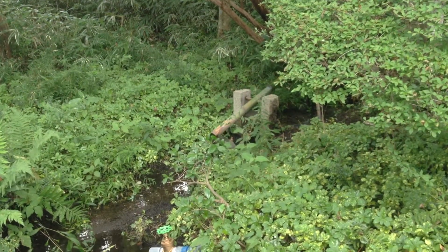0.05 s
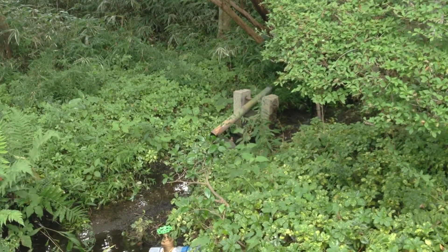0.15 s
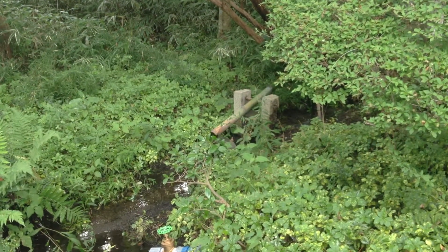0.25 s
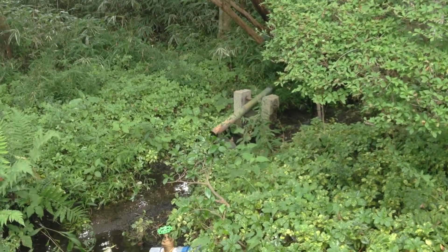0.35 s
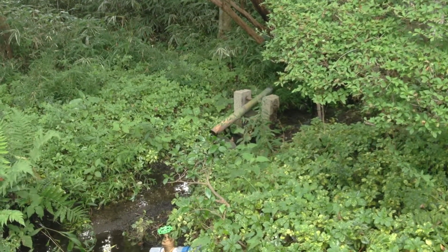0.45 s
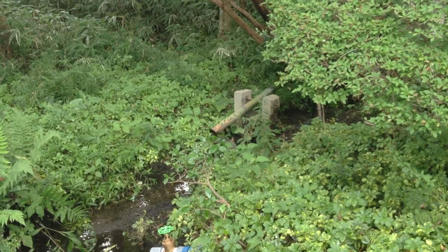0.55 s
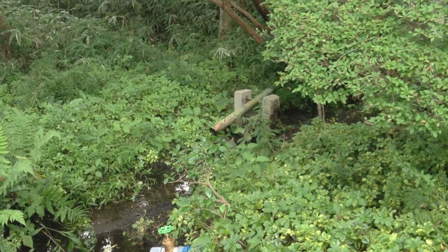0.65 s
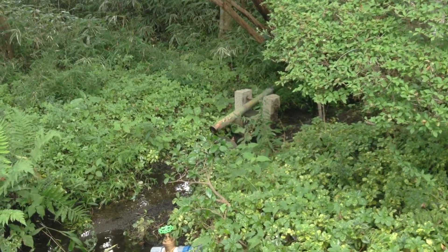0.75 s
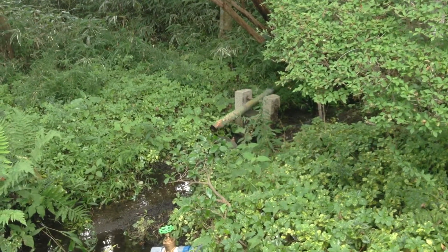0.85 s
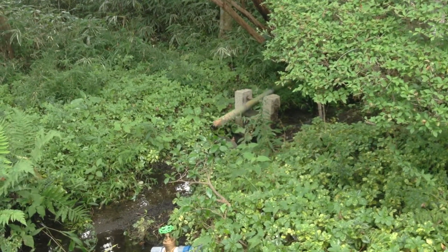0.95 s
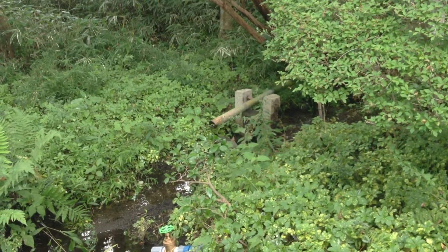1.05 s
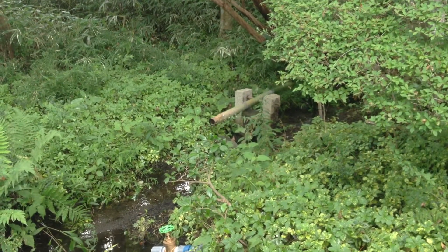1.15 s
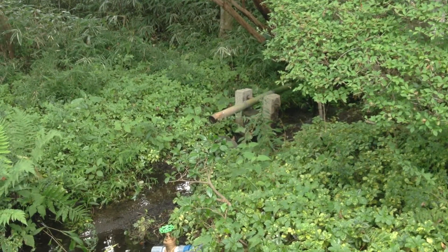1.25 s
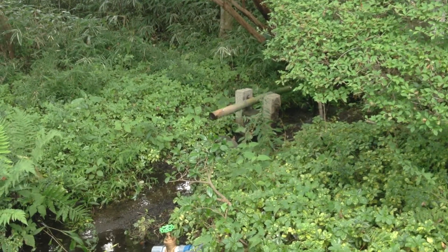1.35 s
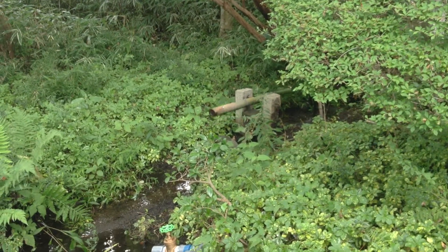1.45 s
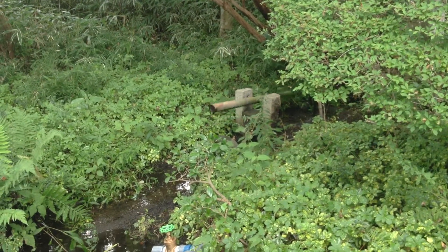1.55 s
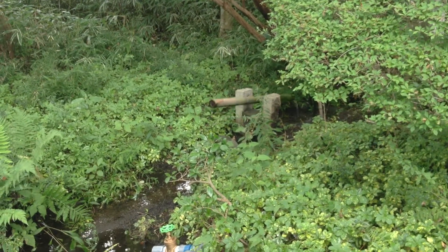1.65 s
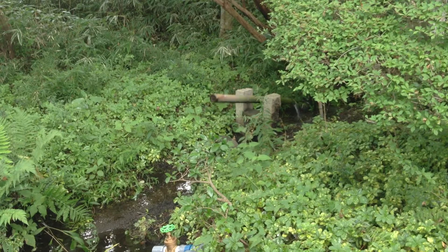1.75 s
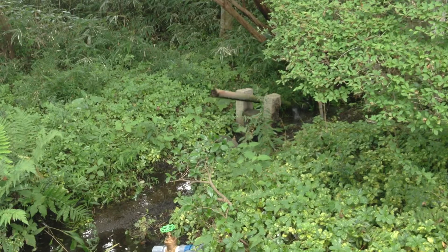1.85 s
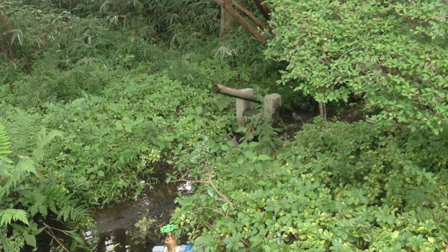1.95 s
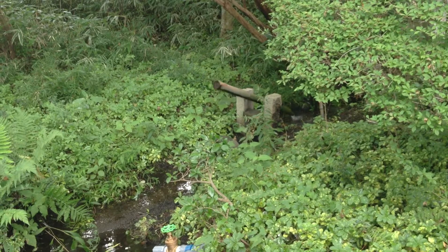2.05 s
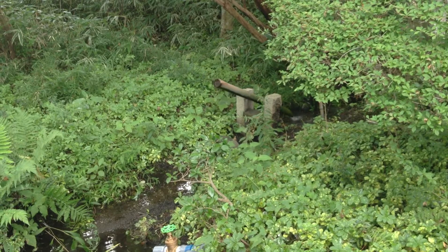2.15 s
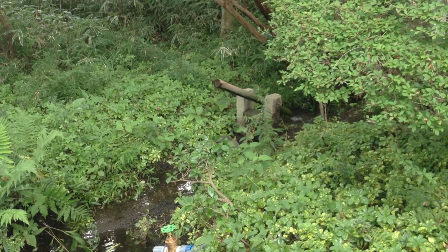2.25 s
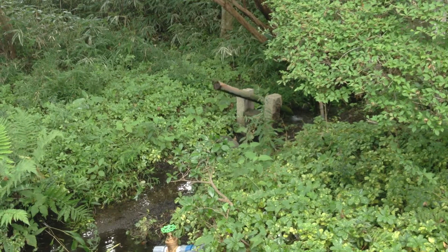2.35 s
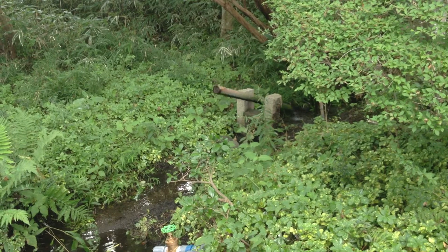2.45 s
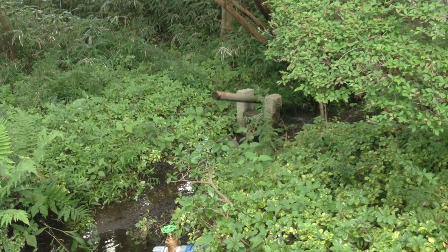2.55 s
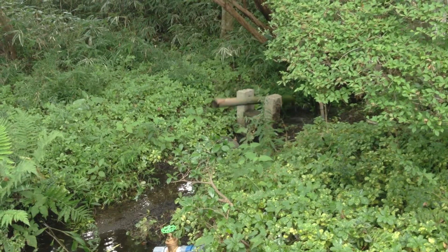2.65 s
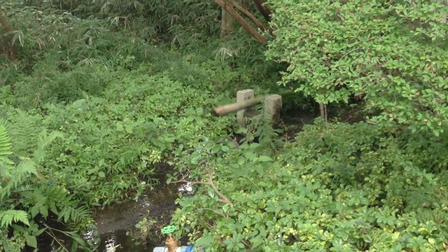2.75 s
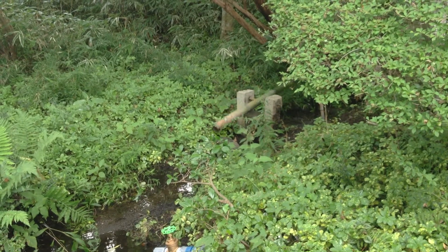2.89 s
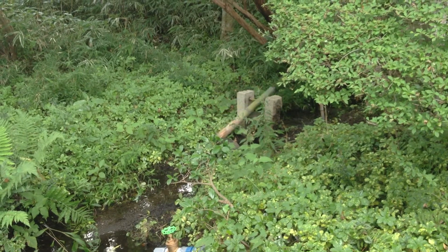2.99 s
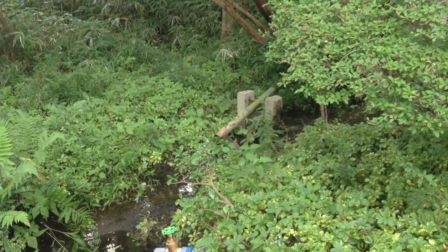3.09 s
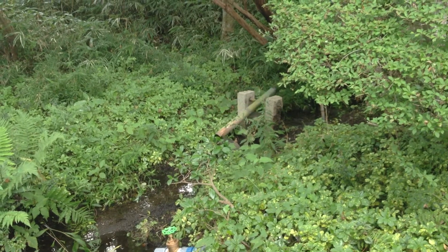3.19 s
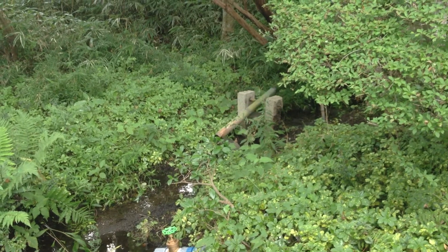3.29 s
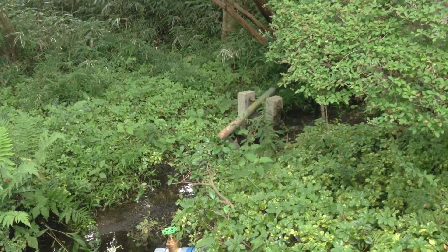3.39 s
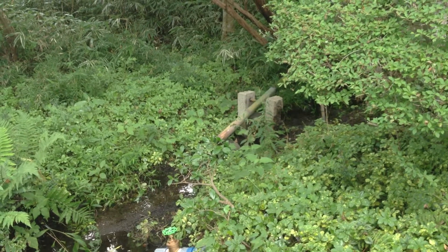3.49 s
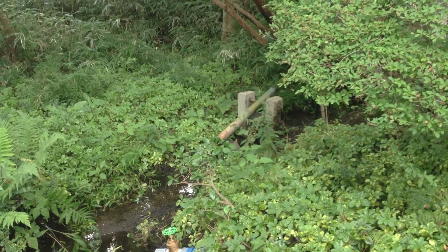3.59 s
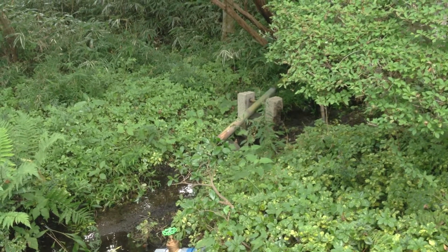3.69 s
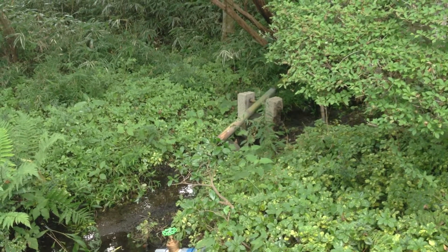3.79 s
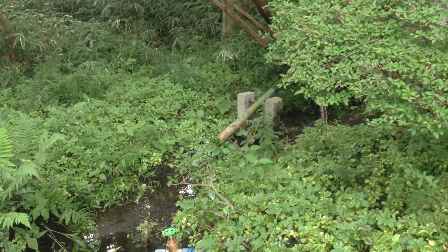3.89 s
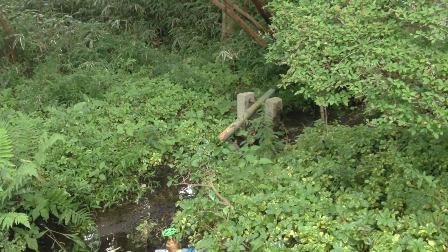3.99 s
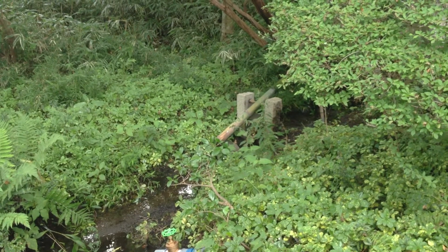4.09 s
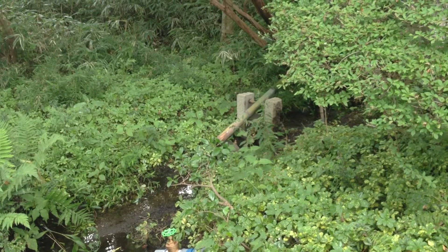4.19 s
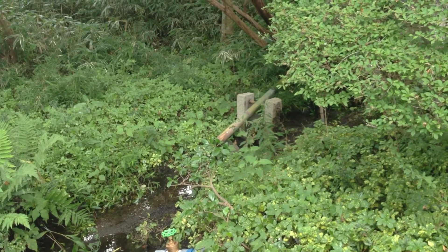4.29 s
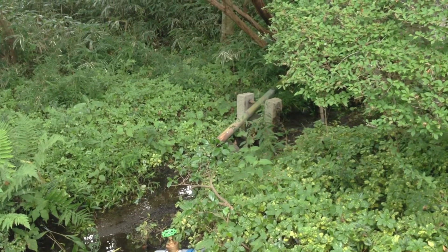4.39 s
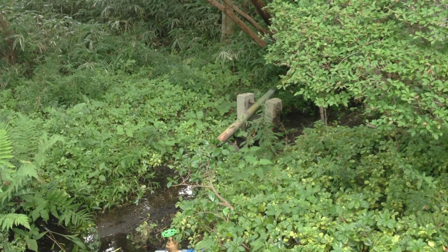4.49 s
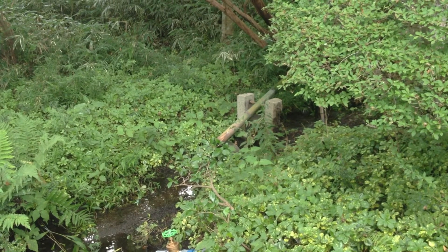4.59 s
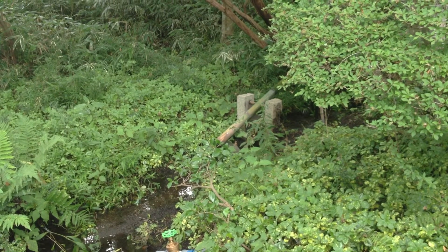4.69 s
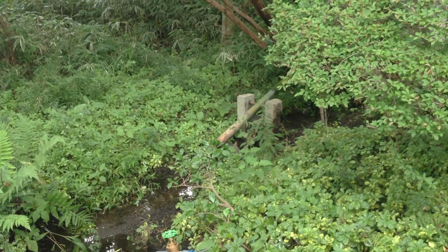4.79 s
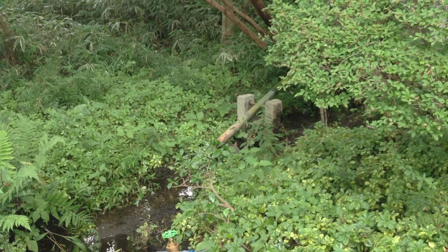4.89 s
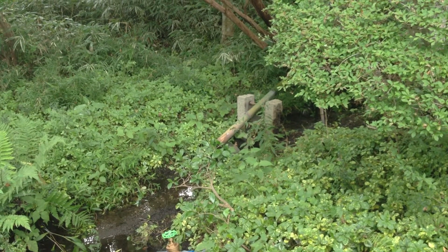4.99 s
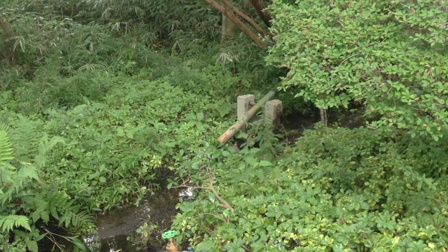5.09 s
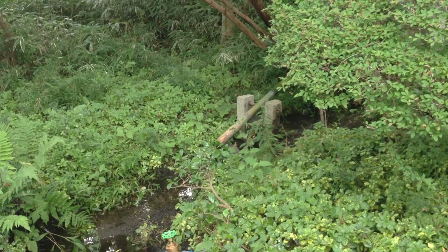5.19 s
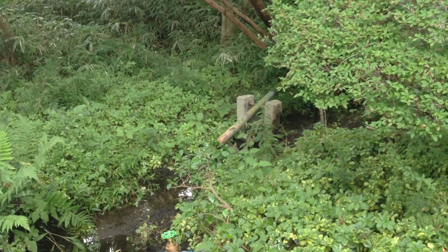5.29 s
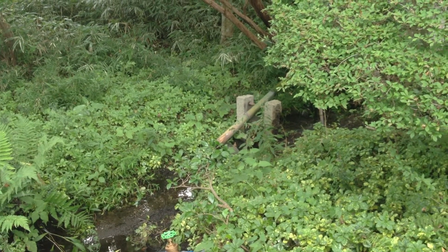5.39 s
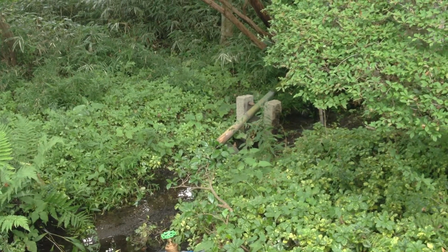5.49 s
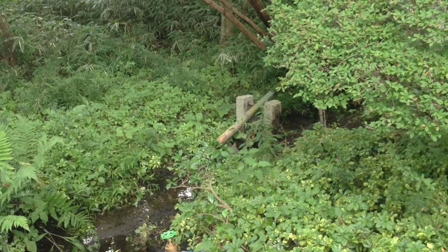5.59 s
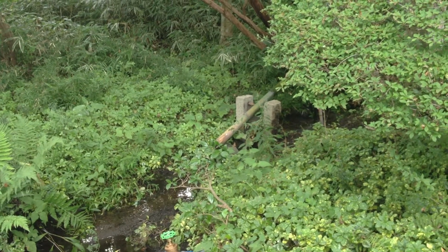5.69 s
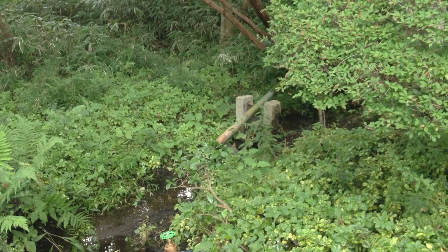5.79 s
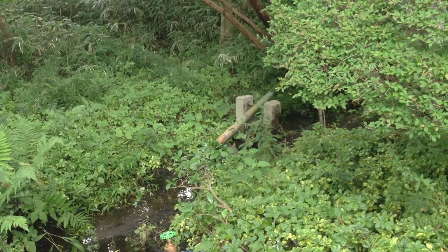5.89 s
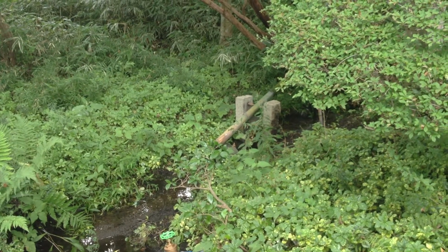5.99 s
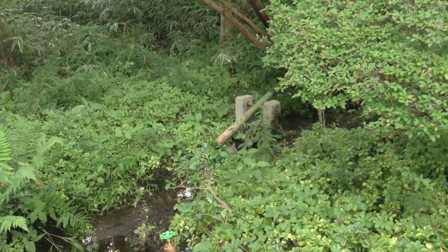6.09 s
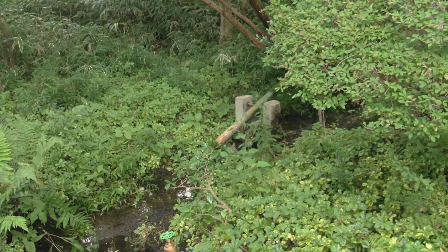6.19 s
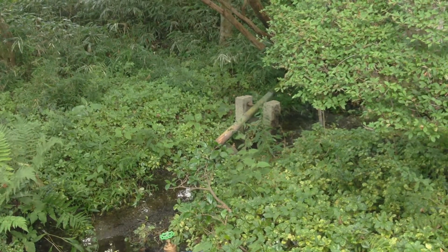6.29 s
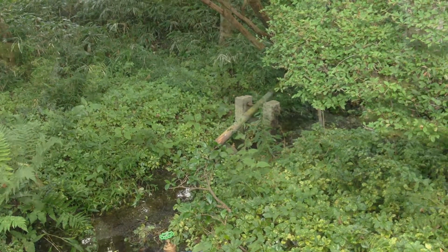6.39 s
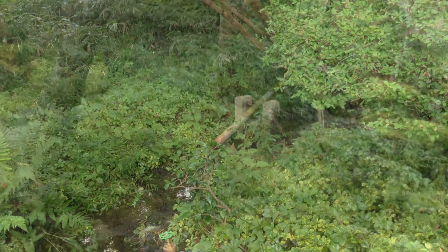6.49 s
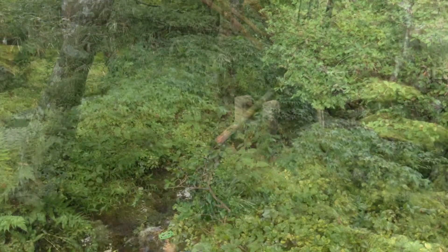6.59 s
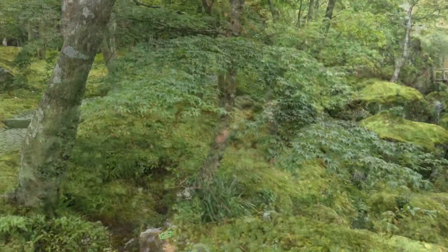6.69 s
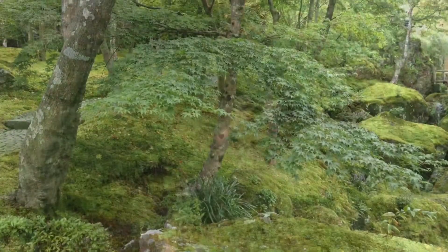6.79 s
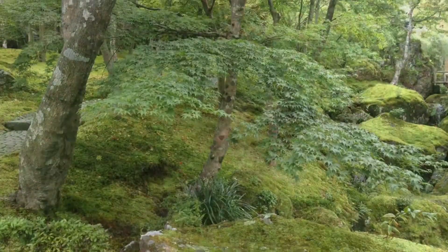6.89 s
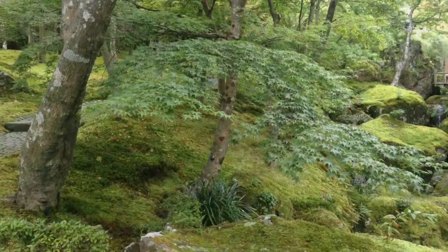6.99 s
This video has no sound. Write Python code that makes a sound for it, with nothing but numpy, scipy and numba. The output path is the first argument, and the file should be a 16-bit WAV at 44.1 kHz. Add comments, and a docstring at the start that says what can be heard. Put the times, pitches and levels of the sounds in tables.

```python
"""A garden stream, where a bamboo deer scarer pours out its water, knocks on its stone and bounces.
A cicada throbs throughout as pitch-swept tymbal clicks, over a hiss of distant cicadas in shaped noise.
The stream is murmuring noise with ringing bubbles; drips ring, drops slap, a far bird whistles wavering sines.
The tube gushes noise and bubbles, then rings as damped modes with cracks of noise.
The garden scatters knocks, pour and drops and returns one dull echo; at the end everything fades."""
import sys
import numpy as np
from scipy import signal
from scipy.fft import rfft, irfft
from scipy.io import wavfile
from numba import njit

SR = 44100
rng = np.random.default_rng(int(sys.argv[2]) if len(sys.argv) > 2 else 0)


def materialize(psi):
    """Save the field psi as 16-bit PCM at rate SR to the path in sys.argv[1].

    A 1-D psi becomes a single channel; in a 2-D psi each row is a channel.
    """
    bounded = np.clip(np.atleast_2d(psi).T, -1, 1)
    quanta = np.round(bounded * 32767).astype(np.int16)
    wavfile.write(sys.argv[1], SR, quanta)


N = 310905
T = np.arange(N) / SR

# Murmur of stream and distant town. Each row: frequency in Hz, relative level in dB.
STREAM_COLOUR = [(25, -36.5), (50, -23), (75, -10.5), (110, 1), (200, 2), (400, -0.5), (700, -3),
                 (1200, -6.5), (1800, -6.5), (2600, -3.5), (3600, -11), (6000, -6.5), (10000, -26.5),
                 (16000, -18.5)]
# Resonances of the cicada's hollow body. Each row: frequency in Hz, relative level in dB.
CICADA_BODY = [(3500, -18), (4600, -8), (5400, -2), (5850, -1.5), (6180, 6), (6600, -2), (7400, -3.5),
               (8100, -4), (8800, -22.5), (10300, -8.5), (11700, 0), (13000, -1), (15200, -1.5)]
# Far cicadas merged into a hiss. Each row: frequency in Hz, relative level in dB.
CHORUS_COLOUR = [(3500, -30.5), (4700, -17.5), (5600, -0.5), (7200, -3), (8800, -23), (10300, -16.5),
                 (11800, -3.5), (13000, -12.5), (15000, -14)]
# The loudest drips in the stream. Each row: start in seconds, level in dB before DRIP_TRIM_DB,
# starting bubble pitch in Hz.
DRIPS = [(0.165, -54, 1130), (0.572, -55, 2890), (1.193, -45.5, 2610), (1.428, -53, 4050),
         (1.788, -49, 2030), (2.615, -54, 790), (2.903, -49.5, 764), (4.275, -54.5, 1144),
         (6.384, -56, 1260), (6.519, -52.5, 756), (6.594, -54, 4480)]
# Drops that slap on stone and leaves. Each row: start in seconds, peak level in dB before SLAP_TRIM_DB,
# centre in Hz.
SLAPS = [(0.823, -42.5, 4540), (1.191, -49, 2900), (1.901, -39, 1330), (2.069, -40, 4100),
         (4.681, -38, 1700), (4.975, -46, 4540), (5.124, -41, 1220), (5.54, -45, 4760), (6.053, -42, 2445)]
# Spray of the pour. Each row: frequency in Hz, relative level in dB.
SPRAY_COLOUR = [(250, -20.5), (550, -2), (1300, -11.5), (2500, 2), (4200, -2), (8000, -10), (15000, -20.5)]
# The tube meets stone and axle. Each row: start in seconds, ring level in dB,
# crack level in dB before CRACK_TRIM_DB, brightness of the contact (low-pass corner) in Hz.
CONTACTS = [(3.0464, -12, -7.5, 5030), (3.0490, 0, 0, 2850), (3.0549, -19.5, -6.5, 14800),
            (3.0602, -24, -6, 4503), (3.0958, -23.5, -12, 5000), (3.4746, -12.5, -14, 1530),
            (3.4968, -22, -20.5, 2330)]
# Modes of the bamboo tube. Each row: frequency in Hz, level in dB, time to lose 60 dB in seconds.
TUBE_MODES = [(241, -37, .9), (396, -36, .38), (535, -31, .07), (590, -25, .14), (730, -28, .17),
              (968, -31, .17), (1030, -18, .08), (1062, -15, .1), (1150, -20, .08), (1184, -17, .12),
              (1270, -24, .15), (1345, -25, .11), (1420, -25, .13), (1505, -34, .14), (1718, -22, .13),
              (1763, -23, .1), (2139, -22, .13), (2224, -20, .09), (2292, -20, .1), (2515, -25, .1),
              (2580, -29, .13), (2820, -27, .12), (2985, -27, .11), (3170, -32, .12), (3450, -26, .1),
              (3880, -24, .1)]
# Dense, quickly damped fibre modes. Each row: frequency in Hz, relative level in dB.
FIBRE_COLOUR = [(40, -45.5), (110, -38), (150, -14.5), (195, -8.5), (320, -13.5), (540, -6), (860, -8.5),
                (1150, 5), (1580, -3), (2350, 1.5), (3200, -6.5), (4100, -3), (5000, -7), (7500, 0),
                (9500, -18.5), (15000, -11.5)]
# Far whistles. Each row: start in seconds, length in seconds, pitch in Hz, level in dB before WHISTLE_TRIM_DB.
WHISTLES = [(4.363, 0.26, 2523, -62), (4.66, 0.12, 2550, -66), (5.386, 0.21, 2543, -64),
            (5.82, 0.2, 2250, -64.5), (6.185, 0.24, 3070, -65.5)]

# trims over a whole layer
DRIP_TRIM_DB, SLAP_TRIM_DB, CRACK_TRIM_DB, WHISTLE_TRIM_DB = 5.0, 1.5, -1.0, 2.5
# the cicada's abdomen pumps ever faster: strokes a second, and their gain each second
STROKE_HZ, STROKE_GAIN_HZ_PER_S = 10.966, 0.177
# tymbal click rate, about which it drifts, and the time constant of effort rising from 0 towards 1
CLICK_HZ, WARM_UP_S = 303.7, 2.154
# song level at first, and what full effort adds
SONG_DB, EFFORT_DB = -49.5, 2
# ring of the slack tymbals at first, what full effort adds, and each stroke's sweep, all before jitter
SLACK_HZ, EFFORT_HZ, SWEEP_HZ = 5613, 400, 1690
# the song dips between strokes and is loudest while the tymbals are still tightening
STROKE_DIP_DB, PUSH_LEAD_RAD = 3, 0.43
# fainter drips fall at random: level before DRIP_TRIM_DB, and range of starting pitch
FAINT_DRIP_DB, FAINT_LOW_HZ, FAINT_HIGH_HZ = -58, 900, 4800
# the tipped tube gushes, runs on while its flow sags, then drains
GUSH_S, GUSH_DB, POUR_HOLD_S = 1.965, -50.5, 0.21
POUR_RISE_DB_PER_S, POUR_SAG_DB_PER_S, POUR_DRAIN_DB_PER_S = 79.5, 19.5, 48
# the straight closing fade is still short of silence when the sound stops
FADE_START_S, FADE_LENGTH_S = 6.238, 0.95
TOP_HZ = 15300


def undb(db):
    """Decibels to gain."""
    return 10 ** (np.asarray(db) / 20)


def unit(x):
    """Scale to rms 1."""
    return x / np.sqrt(np.mean(x ** 2))


def add(out, s, x):
    """Mix x into out from time s on."""
    i = int(np.clip(s * SR, 0, N - 1))
    out[i:i + len(x)] += x[:N - i]


def convolve(x, response):
    """Pass x through an impulse response."""
    return signal.oaconvolve(x, response)[:len(x)]


def colour(x, points):
    """Causal minimum-phase filter with the given (Hz, dB) shape."""
    hz, db = np.transpose(points)
    size = 4096
    grid = np.maximum(np.fft.rfftfreq(size, 1 / SR), 1)
    gain = undb(np.interp(np.log(grid), np.log(hz), db))
    # folding the cepstrum onto positive time makes the filter minimum phase
    cepstrum = irfft(np.log(gain))
    cepstrum[1:size // 2] *= 2
    cepstrum[size // 2 + 1:] = 0
    return convolve(x, irfft(np.exp(rfft(cepstrum))))


def lowpass(x, hz, order=2):
    """Round off everything above hz."""
    return signal.sosfilt(signal.butter(order, min(hz, SR / 2 - 1), fs=SR, output="sos"), x)


def decay(t, t60):
    """Envelope that loses 60 dB in t60 seconds."""
    return np.exp(-np.log(1000) * t / t60)


def walk(rate):
    """Random drift in straight lines between normal draws, rate of them a second."""
    knots = rng.standard_normal(N // 100)
    return np.interp(T * rate, np.arange(len(knots)), knots)


def scatter(t60):
    """One second of dense reflections with unit energy."""
    tail = rng.standard_normal(SR) * decay(T[:SR], t60)
    return tail / np.linalg.norm(tail)


def bubble(hz, cycles, glide):
    """A ringing air bubble whose pitch rises as it nears the surface."""
    life = cycles / hz
    t = T[:SR // 8]
    t = t[t < life]
    tone = np.sin(2 * np.pi * hz * t * (1 + glide * t / life))
    attack = 1 - np.exp(-t * hz)
    return tone * decay(t, life) * attack


def bubbles(chance, low_hz, high_hz, spread_db, cycles, count):
    """A swarm of bubbles of random pitch and level, most frequent where chance is high."""
    out = np.zeros(N)
    share = np.cumsum(chance) / np.sum(chance)
    draws = rng.random((count, 3))
    starts = np.interp(draws[:, 0], share, T)
    for s, (_, pitch, size) in zip(starts, draws):
        hz = low_hz * (high_hz / low_hz) ** pitch
        gain = undb(-spread_db * np.log(size + .01))
        add(out, s, gain * bubble(hz, cycles, glide=0.085))
    return out


def stream():
    """Moving water is a broad murmur of noise with small ringing bubbles in it."""
    murmur = unit(colour(rng.standard_normal(N), STREAM_COLOUR)) * undb(.5 * walk(18))
    trickle = unit(bubbles(np.ones(N), low_hz=607, high_hz=4896, spread_db=-2, cycles=37, count=500))
    return undb(-61.0) * murmur + undb(-76.5) * trickle


@njit
def ring(x, hz, width):
    """A resonator of the given bandwidth in Hz whose pitch moves from sample to sample."""
    y, z = np.empty(len(x)), 0j
    for i in range(len(x)):
        turn_and_decay = np.exp((2j * np.pi * hz[i] - np.pi * width) / SR)
        z = z * turn_and_decay + x[i] + 1e-18
        y[i] = z.imag
    return y


def cicada():
    """Two tymbals click in turn; each stroke of the abdomen tightens them and sweeps their ring up and down."""
    effort = 1 - np.exp(-T / WARM_UP_S)
    stroke_cycles = np.cumsum(STROKE_HZ + STROKE_GAIN_HZ_PER_S * T) / SR - .055
    stroke = 2 * np.pi * stroke_cycles
    # the tymbals tighten slowly and let go quickly
    tension = (1 + np.cos(stroke - .45 * np.cos(stroke) + .15)) / 2
    push = (1 + np.cos(stroke + PUSH_LEAD_RAD)) / 2

    turn = np.floor(np.cumsum(CLICK_HZ * (1 + .008 * walk(200))) / SR)
    # one tymbal is louder than the other, and every click varies
    click_db = 0.86 * (-1) ** turn + 2.4 * walk(250) + STROKE_DIP_DB * push
    clicks = np.diff(turn, prepend=0) * undb(click_db)

    jitter = 1 + 0.017 * walk(300)
    pitch_hz = (SLACK_HZ + EFFORT_HZ * effort + SWEEP_HZ * tension) * jitter
    # two resonances in a row round each click and keep the band's edges steep
    fundamental = unit(ring(ring(clicks, pitch_hz, 650.), pitch_hz, 1900.))
    tense_clicks = clicks * undb(3 * tension)
    overtone = unit(ring(ring(tense_clicks, 2 * pitch_hz, 1600.), 2 * pitch_hz, 2600.))
    song = colour(fundamental + undb(-3.0) * overtone, CICADA_BODY)

    # near leaves and far trunks blur the clicks a little
    leaves = undb(-3.5) * convolve(song, scatter(t60=.025))
    trunks = undb(-9) * convolve(song, scatter(t60=.4))
    return undb(SONG_DB + EFFORT_DB * effort) * unit(song + leaves + trunks)


def chorus():
    """Distant cicadas merge into a steady hiss of shaped noise."""
    return undb(-53.5) * unit(colour(rng.standard_normal(N), CHORUS_COLOUR))


def drops():
    """Single drips ring as bubbles; drops on stone and leaves give a short slap of noise."""
    out, t = np.zeros(N), T[:SR // 10]
    faint = []
    for when, pitch in rng.random(size=(14, 2)):
        hz = FAINT_LOW_HZ * (FAINT_HIGH_HZ / FAINT_LOW_HZ) ** pitch
        faint.append((when * T[-1], FAINT_DRIP_DB, hz))
    for s, db, hz in DRIPS + faint:
        add(out, s, undb(db + DRIP_TRIM_DB) * bubble(hz, cycles=25 + hz / 40, glide=0.029))
    for s, db, hz in SLAPS:
        burst = rng.standard_normal(len(t)) * decay(t, 0.039)
        slap = colour(burst, [(hz / 3, -22), (hz, 0), (hz * 3, -16)])
        add(out, s, undb(db + SLAP_TRIM_DB) * slap / np.abs(slap).max())
    return out


def pour_flow():
    """Flow from the tube as a gain: a quick rise, a sagging hold and a slower release."""
    age = T - GUSH_S
    rise = POUR_RISE_DB_PER_S * np.minimum(age, 0)
    sag = POUR_SAG_DB_PER_S * np.clip(age, 0, POUR_HOLD_S)
    drain = POUR_DRAIN_DB_PER_S * np.maximum(age - POUR_HOLD_S, 0)
    return undb(GUSH_DB + rise - sag - drain)


def pour():
    """The tube empties: spray hisses in clumps, and bubbles come thicker the more water falls."""
    flow = pour_flow()
    gurgle = bubbles(flow, low_hz=1000, high_hz=6500, spread_db=3.5, cycles=14, count=260)
    gurgle /= np.sqrt(np.average(gurgle ** 2, weights=flow))  # rms 1 where the water falls
    clumps = undb(3.2 * walk(100))
    spray = unit(colour(rng.standard_normal(N) * clumps, SPRAY_COLOUR))
    return flow * (spray + .5 * gurgle)


def knocks():
    """Each contact rings the tube's modes and cracks its fibres, with a brightness of its own."""
    out, t = np.zeros(N), T[:SR]
    tube = np.zeros(SR)
    for k, (hz, db, t60) in enumerate(TUBE_MODES):
        tube += (-1) ** k * undb(db) * np.sin(2 * np.pi * hz * t) * decay(t, t60)
    tube *= 1 - np.exp(-t / 0.002)  # the ring builds up as the blow travels along the tube
    for s, ring_db, crack_db, bright_hz in CONTACTS:
        # a sharp crack, then a longer buzz of fibres
        snap = rng.standard_normal(SR) * decay(t, 0.06)
        buzz = rng.standard_normal(SR) * decay(t, 0.44)
        buzz = colour(buzz, [(200, -18), (1200, -23), (7000, -19.5), (12000, -10)])
        crack = colour(snap + buzz, FIBRE_COLOUR)
        contact = undb(ring_db) * tube + undb(crack_db + CRACK_TRIM_DB) * crack
        add(out, s, lowpass(contact, bright_hz))
    # so slim a tube radiates little bass
    return signal.sosfilt(signal.butter(3, 140, "highpass", fs=SR, output="sos"), out)


def bird():
    """Thin, slightly wavering whistles, heard only as scattered by the trees."""
    out, waver = np.zeros(N), 1 + 0.035 * walk(200)
    for s, length, hz, db in WHISTLES:
        swell = np.sqrt(np.maximum(1 - (2 * (T - s) / length - 1) ** 2, 0))
        tone = np.sin(2 * np.pi * np.cumsum(hz * waver) / SR)
        out += undb(db + WHISTLE_TRIM_DB) * swell * tone
    return convolve(out, scatter(t60=0.14))


def garden(x):
    """Plants and stones scatter the sound, far trees hold it, and a bank returns one dull echo."""
    near = convolve(x, scatter(t60=.18))
    far = lowpass(convolve(x, scatter(t60=1.0)), 6000, order=1)
    out = x + undb(-10.0) * near + undb(-29.0) * far
    blurred = x + undb(-10.0) * convolve(x, scatter(t60=0.044))
    add(out, .1055, undb(-18.0) * lowpass(blurred, 1900))
    return out


def scene():
    """The deer scarer and its stream under the cicadas."""
    in_garden = garden(knocks() + pour() + drops())
    return (in_garden + stream() + bird() + cicada() + chorus())[None]


def record(dry):
    """Fade down at the end and cut the top steeply."""
    faded = dry * np.clip(1 - (T - FADE_START_S) / FADE_LENGTH_S, 0, 1)
    return signal.sosfilt(signal.ellip(12, .1, 80, TOP_HZ, fs=SR, output="sos"), faded)


dry = scene()
out = record(dry)
materialize(out)
```